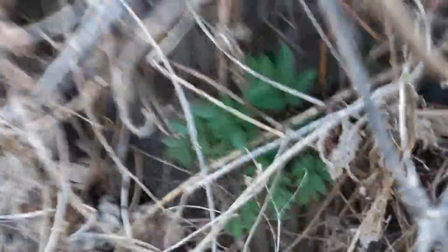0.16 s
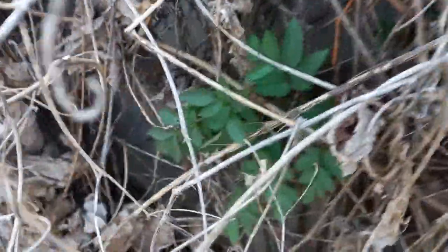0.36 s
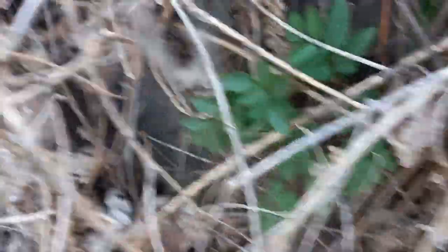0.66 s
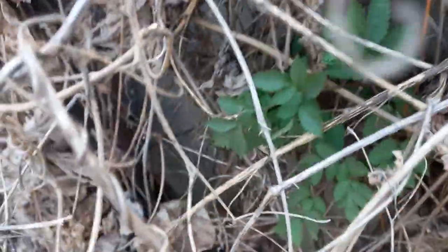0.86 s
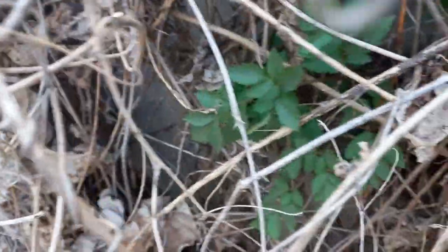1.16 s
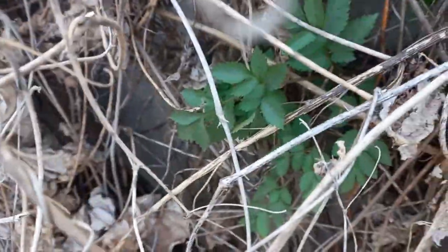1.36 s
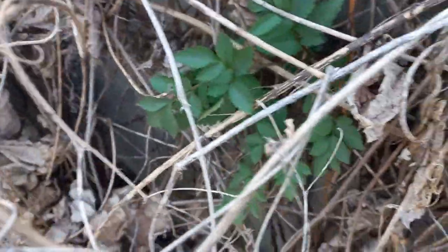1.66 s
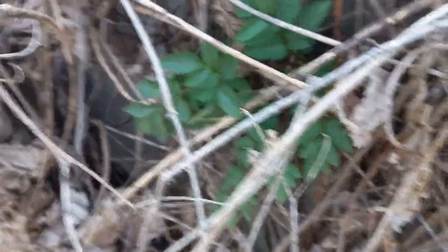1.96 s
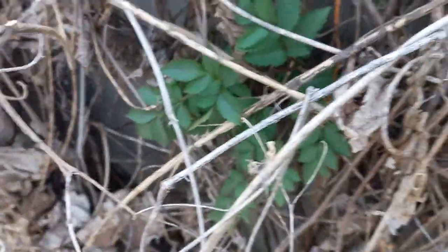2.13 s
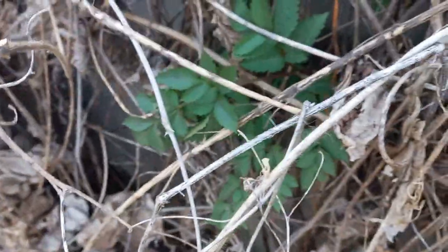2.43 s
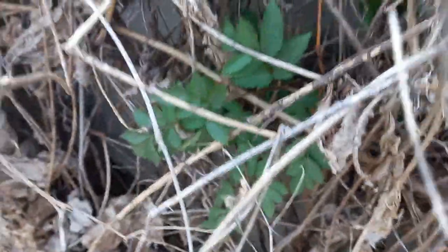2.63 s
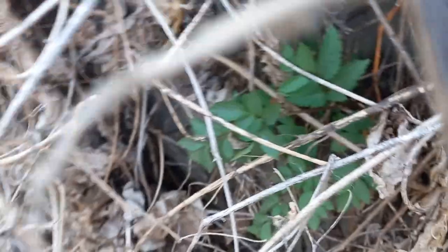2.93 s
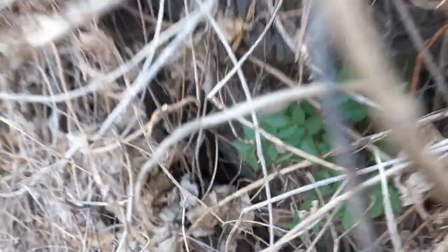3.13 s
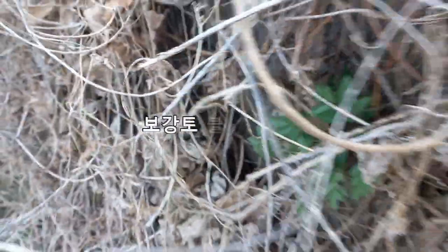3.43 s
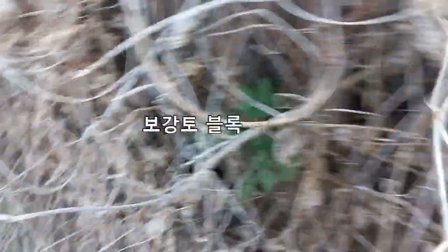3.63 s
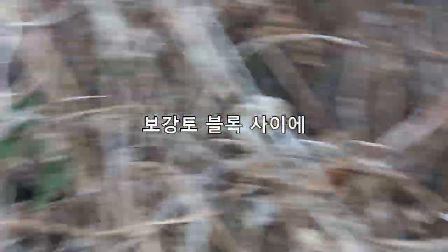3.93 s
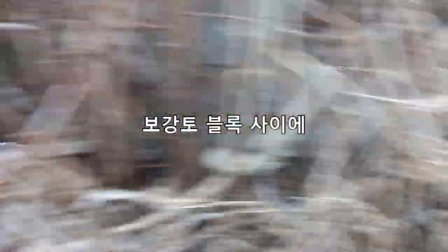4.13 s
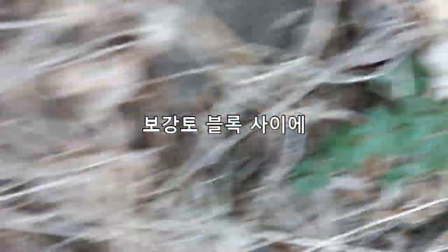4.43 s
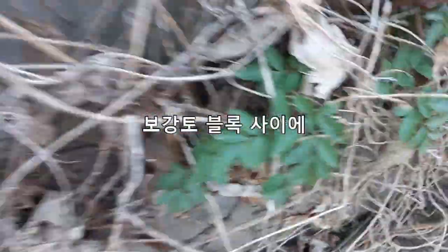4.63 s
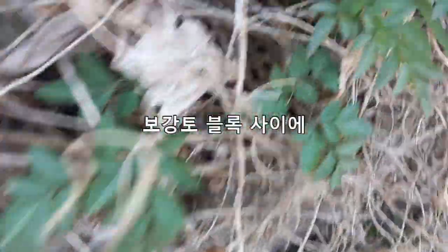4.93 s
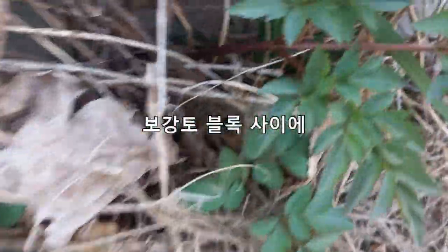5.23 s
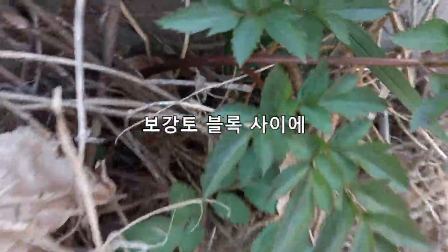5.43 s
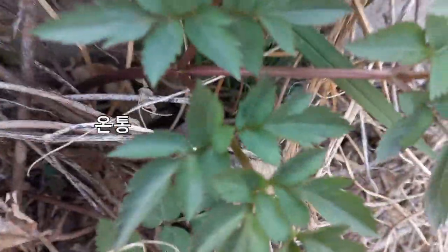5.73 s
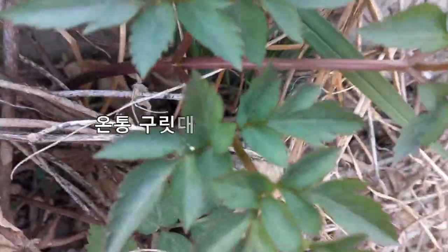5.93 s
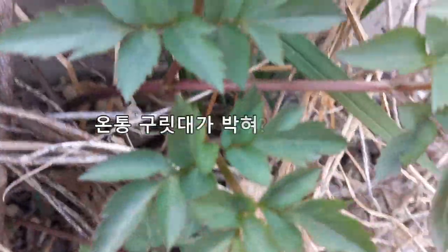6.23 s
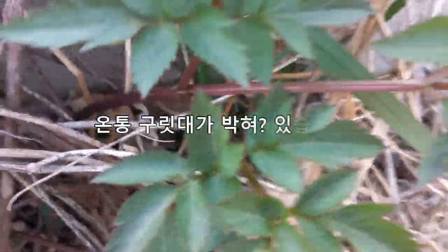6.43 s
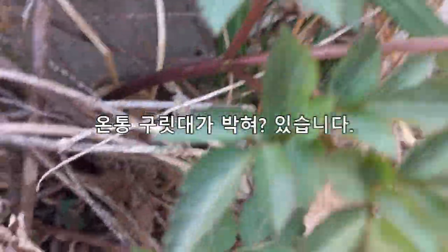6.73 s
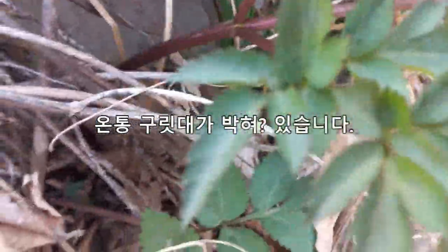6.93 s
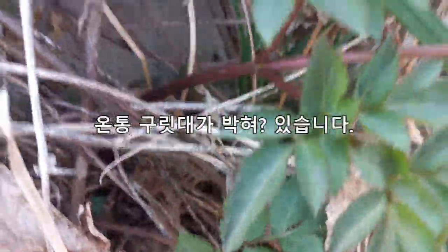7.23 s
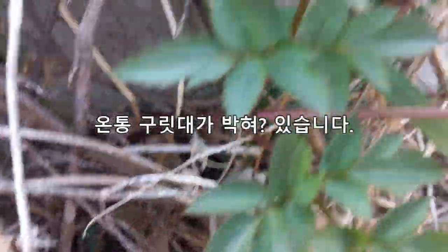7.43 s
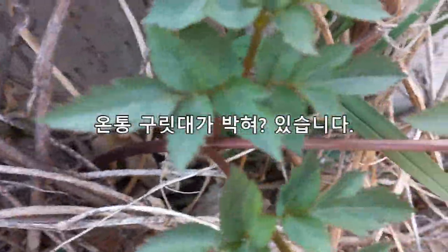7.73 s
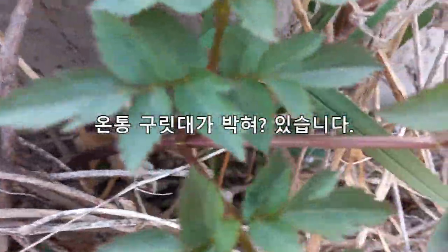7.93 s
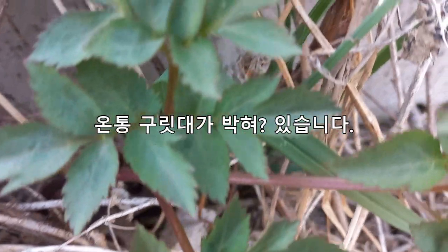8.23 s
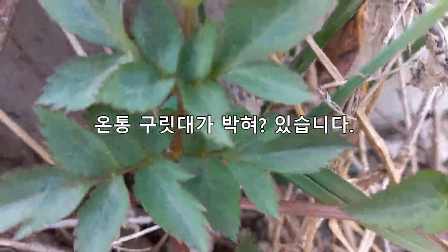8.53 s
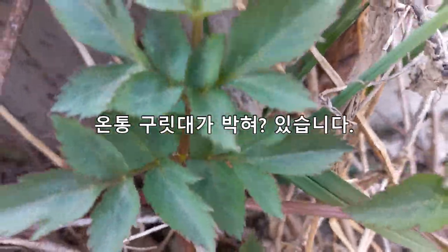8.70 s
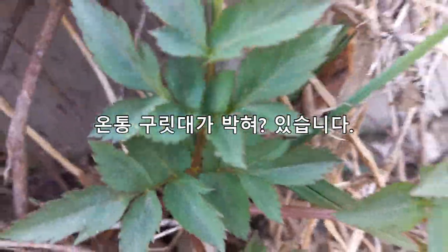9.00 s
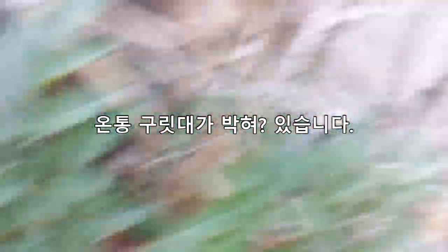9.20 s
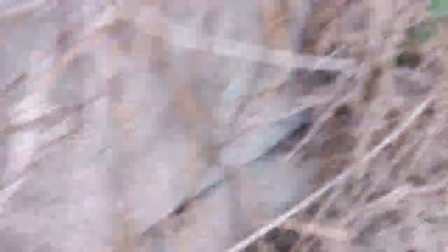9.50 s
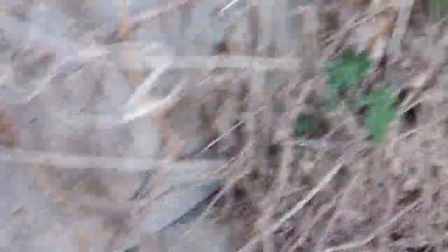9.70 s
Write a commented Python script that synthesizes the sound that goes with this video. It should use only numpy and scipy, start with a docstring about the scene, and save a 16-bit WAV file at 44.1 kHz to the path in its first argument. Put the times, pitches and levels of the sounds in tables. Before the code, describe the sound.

A quiet outdoor bank with low far rumble and soft microphone hiss, recorded close by hand in stereo. Grass stirs at once; from 0.2 to 1.0 s it is pushed aside hard, loudest around 0.6 s, with bright rustling and a dense volley of sharp stem snaps at 0.8-1.0 s, mostly left. It eases to soft rubbing until 2.2 s, then snaps and swishes return, with dry scrapes at 3.1-3.2 s and rustling to 3.7 s. Dull knocks and litter crunch fall near 3.9 s, a small knock at 4.5 s, then a lull. At 5.3-5.8 s stems scrape and crackle, with one hard crack at 5.73 s. Light ticks thin out through 6.7 s. Very faint, sliding bird notes sound far off around 7-7.4 s, barely again later. Sparse snaps follow, a short scrape near 9 s, and a clearer crack at 9.25 s before quiet.

```python
"""A scrubby bank: from the start, a low far rumble and microphone hiss, as shaped noise, under stirring grass.
Within half a second grass and brittle stems are pushed aside close to a hand-held camera: noise with grains
of crackle, single snaps as short noise cracks, crunching steps as dull grains, dull knocks as ringing sines.
The rubbing comes in bursts with easier spells between. From about seven seconds a small bird calls far off,
as sliding sines with echoes, while the last stems stir and snap."""
import sys
import numpy as np
from scipy import signal
from scipy.fft import rfft, irfft, next_fast_len
from scipy.io import wavfile
from scipy.ndimage import uniform_filter1d, map_coordinates

SR = 44100
rng = np.random.default_rng(int(sys.argv[2]) if len(sys.argv) > 2 else 0)


def to_wav(sig):
    """Store sig (one row per channel, or 1-D mono) as 16-bit WAV at the path in sys.argv[1].

    Samples outside -1..1 are clipped; the rate is SR.
    """
    pcm = np.clip(np.atleast_2d(sig), -1, 1) * 32767
    pcm = np.round(pcm).astype(np.int16)
    wavfile.write(sys.argv[1], SR, pcm.T)  # frames by channels


N = 434826

# In all tables the levels are relative: each layer adds a gain of its own. Positive left_right_db is left.
# background far off and in the microphones: start_s, rumble_db, hiss_db
BACKGROUND = [(0, -63, -73), (.9, -60.5, -77), (1.1, -73.5, -85), (1.6, -71.5, -82), (2.5, -68, -77.5),
              (9.86, -69, -79)]
# colour of the far rumble: frequency_hz, density_db (per Hz)
RUMBLE_COLOUR = [(15, -71.5), (25, -43.5), (45, -18), (91, -2), (267, -11), (647, -14.5), (900, -26),
                 (1170, -48), (1980, -120)]
# colour of the microphone hiss: frequency_hz, density_db (per Hz)
HISS_COLOUR = [(410, -30), (700, -6.5), (1240, -8), (2010, -10), (3620, -14), (5220, -19), (6950, -14),
               (15900, -18.5)]
# grass settling between the movements: start_s, level_db
SETTLING = [(0, -49), (.3, -55), (1.05, -71), (1.5, -86), (2.2, -65.5), (3.8, -64), (4.3, -76.5),
            (5.29, -83), (5.32, -71), (6.05, -56.5), (6.45, -62.5), (6.6, -68.5), (7.3, -86), (7.7, -68.5),
            (8.6, -83), (8.74, -65.5), (8.9, -88), (9.05, -65.5), (9.45, -81.5), (9.82, -72.5)]
# where the hand works: start_s, thickness_db (share of the lower crackle), left_right_db
HAND_PLACE = [(0, -2, -6), (.45, -7.5, 5), (.62, -2.5, 8), (.96, -3, 14), (1.35, -11, 7.5), (1.75, -6, 3),
              (1.95, -13.5, 11), (2.3, -5, 6.5), (2.66, -1, 11), (2.97, -7.5, -4.5), (4.64, -3, -6.5),
              (5.3, 0, 8), (5.74, 1.5, 13.5), (6.26, -8, 2), (7.6, -4.5, 9), (9.3, -4.5, 20),
              (9.86, -2.5, -2.5)]
# the hand pushes through the grass, swelling and easing: loudest_s, level_db, swell_s (over 20 dB)
HAND_PUSHES = [(0.245, -37, 0.04), (0.459, -36.5, 0.25), (0.613, -27.5, 0.0331), (0.721, -33.5, 0.0331),
               (.8, -37.5, 0.13), (.9, -42.5, 0.14), (1.321, -47.5, 0.13), (1.659, -53.5, 0.07),
               (1.724, -43.5, 0.0857), (1.9, -50, 0.17), (2.335, -45.5, .03), (2.562, -45, .012),
               (2.642, -40.5, 0.09), (2.7, -42.5, 0.06), (2.865, -53, 0.25), (3.0, -49, 0.04),
               (3.31, -51.5, 0.24), (3.39, -43, 0.17), (3.6, -44.5, 0.16), (3.689, -41.5, 0.13),
               (3.97, -51.5, 0.1), (4.51, -58.5, 0.21), (5.368, -44, 0.072), (5.452, -45, 0.08)]
# a stem catches and drags: loudest_s, level_db, fade_s (over 20 dB, held to 0.003 s or more)
STEM_SCRAPES = [(.378, -36.5, 0.26), (0.66, -36, -0.13), (2.105, -53.5, 0.13), (2.257, -45.5, 0.11),
                (3.071, -41, 0.06), (3.168, -36, 0.16), (5.435, -37.5, 0.015), (5.521, -40, 0.03),
                (5.592, -35.5, 0.03), (5.736, -29.5, 0.0278), (5.759, -31, 0.05), (5.909, -44.5, 0.04),
                (6.024, -51.5, 0.08), (7.563, -51, 0.16), (7.868, -55, 0.16), (8.629, -45, 0.0248),
                (8.952, -46, 0.0453), (8.973, -36, 0.024), (9.22, -44, 0.0345)]
# colour of thin blades: frequency_hz, density_db (per Hz)
BLADE_COLOUR = [(2940, -28.5), (5000, -16), (7170, -12), (8450, -17.5), (11000, -10.5), (15000, -5),
                (15900, -13)]
# colour of hollow stems: frequency_hz, density_db (per Hz)
STEM_COLOUR = [(800, -14), (1400, -6), (1800, -6.5), (2300, -2.5), (2900, -5.5), (4300, -1), (5600, -7),
               (7150, -1), (8300, -7.5), (10500, -2.5), (12500, -7)]
# top treble of the blades: start_s, level_db
BLADE_SHEEN = [(0, 2.5), (4, -3), (5.3, -5.5), (8, -2), (9.86, -2)]
# litter crushed underfoot: loudest_s, level_db, rise_s, fall_s (both over 20 dB)
FOOTSTEPS = [(.44, -61.5, 0.47, 0.2), (.88, -61, 0.36, 0.15), (2.83, -63.5, 0.39, 0.19),
             (3.45, -65, 0.45, 0.39), (3.906, -53, 0.0037, 0.22), (3.968, -44, 0.048, 0.033),
             (4.515, -53, 0.031, 0.083), (5.738, -56.5, 0.011, 0.098)]
# colour of the litter: frequency_hz, density_db (per Hz)
LITTER_COLOUR = [(71, -52.5), (120, -9), (284, -3.5), (437, -1), (850, -3.5), (2520, -24), (3000, -35),
                 (6600, -120)]
# stems breaking: start_s, level_db, thickness_db (hollow-stem part against thin-blade part)
STEM_SNAPS = [(0.3351, -23.5, -21.5), (0.5917, -22.5, -17.5), (0.656, -27, -22), (.6964, -36.5, -12),
              (.742, -25.5, -16), (0.797, -14.5, -22.5), (0.805, -29, -16), (0.8112, -27, -22),
              (.8431, -26, -12), (0.8553, -17, -18), (0.8667, -17, -15), (0.889, -23, -15),
              (0.899, -15.5, -10.5), (0.9553, -17.5, -15.5), (.958, -28, -17), (.962, -31, -30),
              (.9748, -23, -22), (0.977, -19, -22), (1.0143, -29.5, -23), (1.0264, -26.5, -14.5),
              (1.1282, -41, -12), (2.2511, -34, -20.5), (2.4654, -21.5, -19.5), (2.5715, -34.5, -7),
              (2.6544, -24.5, -7.5), (2.9022, -26.5, -22), (2.9747, -33, -13.5), (3.064, -30, -10),
              (3.0718, -33.5, -15), (3.075, -31, -13), (3.126, -35, -5.5), (3.2077, -30.5, -12),
              (3.403, -39, -5.5), (3.467, -43.5, 6.5), (3.5, -34, -14), (5.31, -37, -1), (5.327, -37, -4),
              (5.47, -34, -2.5), (5.503, -33.5, -10), (5.732, -15, -10), (5.749, -27, -5.5),
              (5.7735, -29, -18), (5.885, -34.5, -20), (5.961, -31, -23), (6.071, -32.5, -30),
              (6.16, -44, -3.5), (6.2022, -35, -22), (6.243, -32, -5), (6.32, -46, -6.5), (6.327, -41, -16),
              (6.334, -42, -8.5), (6.343, -44.5, -5.5), (6.389, -42, -7), (6.7336, -34.5, -27),
              (7.409, -45.5, -7.5), (7.656, -30, -15.5), (7.71, -39.5, -12), (7.748, -43, -11.5),
              (7.893, -48, -13), (8.146, -49.5, -6.5), (8.307, -49, -11), (8.6234, -40, -7),
              (8.7175, -39, -8), (9.248, -24.5, -14), (9.27, -40, -11)]
# hollow stalks and the camera body knocked: start_s, level_db, pitch_hz, t60_s, left_right_db
STALK_KNOCKS = [(0.4223, -37.5, 716, 0.013, 8), (0.866, -31, 146, 0.0072, 27), (0.977, -36, 94, 0.058, 29),
                (2.061, -56.5, 720, 0.027, 0), (2.637, -44.5, 2130, 0.055, 21),
                (3.4659, -39, 705, 0.014, 8), (3.684, -41.5, 111, 0.019, -3),
                (3.931, -34, 276, 0.024, -1.5), (3.973, -40, 796, .025, 0), (4.499, -38.5, 840, 0.014, 6),
                (4.507, -39.5, 644, 0.016, -10), (5.7327, -28.5, 10950, 0.011, 16),
                (5.759, -42.5, 2400, 0.044, 13), (6.2452, -53, 1500, .021, 0),
                (6.243, -50.5, 2620, 0.036, 0), (6.733, -61, 5050, 0.05, 5)]
# bird notes, held then sliding: start_s, hold_s, slide_s, first_hz, last_hz, level_db
BIRD_NOTES = [(6.972, 0.044, .045, 7600, 6340, -83.5), (7.136, 0.052, 0.038, 7370, 5700, -78.5),
              (7.289, 0.016, 0.069, 6780, 3270, -79), (8.44, 0.08, .01, 3670, 3660, -93),
              (9.27, 0.01, 0.047, 4700, 4140, -80)]

EASE, ROUNDNESS = 0.84, 1.17  # easing time over swelling time; 1 pointed, 2 round
CATCH_S = 0.0063  # rise of a scrape over 20 dB
SHEEN_HZ = 11200
NOTE_EDGE_S, SLIDE_LOSS_DB = 0.0041, 5  # fade in and out of a note; weakening over its slide
SHELF_HZ, TOP_HZ = 15900, 16984  # top treble is weaker above SHELF_HZ, silent above TOP_HZ


def amp(db):
    """Decibels to linear gain."""
    return 10 ** (np.asarray(db) / 20)


def unit(x):
    """Scale to an rms of 1."""
    return x / np.sqrt(np.mean(x ** 2) + 1e-20)


def curves(rows):
    """One value per sample for each column after the time."""
    s, *cols = np.transpose(rows)
    return np.array([np.interp(np.arange(N) / SR, s, c) for c in cols])


def sides(pan_db):
    """Left and right gains of constant total power."""
    ratio = amp(pan_db)
    return np.array([ratio, np.ones_like(ratio)]) * np.sqrt(2 / (1 + ratio ** 2))


def filtered(x, response):
    """Multiply the spectrum of x by a response of frequency."""
    m = next_fast_len(N + 8192)
    return irfft(rfft(x, m) * response(np.fft.rfftfreq(m, 1 / SR)), m)[..., :N]


def coloured(x, spectrum):
    """Shape x by (Hz, dB) points on a log axis, power kept for white input."""
    f, db = np.transpose(spectrum)

    def gain(hz):
        return unit(amp(np.interp(np.log(hz + 1), np.log(f), db, left=-120, right=-120)))

    return filtered(x, gain)


def noise(alike, patchy_db, size=128):
    """Stereo white noise with a shared part; its colour changes in short random patches."""
    z = signal.stft(rng.standard_normal((2, N)), nperseg=size)[2]
    patches = rng.standard_normal(z.shape[1:])
    patches = unit(uniform_filter1d(uniform_filter1d(patches, 5, 0), 3, 1))
    a, b = unit(signal.istft(z * amp(patchy_db * patches), nperseg=size)[1][:, :N])
    alike = np.clip(alike, 0, 1)
    return np.array([a, alike * a + np.sqrt(1 - alike ** 2) * b])


def fading(kicks, t60):
    """Every kick dies away exponentially."""
    return signal.lfilter([1], [1, -amp(-60 / (max(t60, 1e-3) * SR))], kicks)


def grains(rate, spread_db, t60):
    """Envelope of rms 1 of random contacts: many small, few large, coming in clumps."""
    clump = amp(4 * map_coordinates(rng.standard_normal(500), [np.arange(N) * 490 / N]))
    draw = rng.random((3, N))
    size = amp(-spread_db * np.log(draw[1:] + 0.00059).sum(0))
    kicks = (draw[0] < rate * clump / SR) * size
    return unit(fading(fading(kicks, t60), t60))  # twice: a rounded rise


def swells(rows, roundness):
    """Level that rises to each (s, dB, rise s, fall s) peak and falls away; powers add."""
    t, power = np.arange(N) / SR, np.zeros(N)
    for s, db, *spans in rows:
        rise, fall = np.maximum(spans, .003)
        near = slice(max(round((s - 4 * rise) * SR), 0), round((s + 4 * fall) * SR))
        away = np.where(t[near] < s, (s - t[near]) / rise, (t[near] - s) / fall)
        power[near] += amp(db - 20 * away ** roundness) ** 2
    return np.sqrt(power)


def air():
    """Far rumble, partly shared by the microphones, and hiss almost wholly each one's own."""
    rumble_db, hiss_db = curves(BACKGROUND)
    rumble = coloured(noise(0.22, patchy_db=0.6, size=2048), RUMBLE_COLOUR)
    hiss = coloured(noise(0.018, patchy_db=0.8, size=512), HISS_COLOUR)
    rumble = amp(rumble_db + 3.0) * sides(4.8)[:, None] * rumble
    return rumble + amp(hiss_db + 9) * sides(1.5)[:, None] * hiss


def stems():
    """Rubbing and breaking shake the same thin blades and hollow stems."""
    thin, thick = rubbing() + breaking()
    thin = coloured(thin, BLADE_COLOUR)
    top = filtered(thin, lambda hz: 1 / (1 + (SHEEN_HZ / (hz + 1)) ** 8))
    sheen = amp(curves(BLADE_SHEEN)[0])
    return thin + (sheen - 1) * top + coloured(thick, STEM_COLOUR)


def rubbing():
    """Blades and stems slide over each other: a hiss with crackle on it, as (thin or thick, side, sample)."""
    thick_db, pan_db = curves(HAND_PLACE)
    stroke = movement()
    # settling blades tick one by one
    stir = amp(curves(SETTLING)[0]) * (.5 + grains(rate=120, spread_db=0.5, t60=0.011))
    crackle = 0.7 * grains(rate=700, spread_db=2.5, t60=0.0087)
    crackle += .8 * grains(rate=170, spread_db=2.2, t60=.002)  # shorter, sparser ticks
    slow_crackle = 0.5 * grains(rate=190, spread_db=1.5, t60=0.029)  # thick stems only
    thin = stroke * (0.9 + crackle) + 2 * stir
    thick = stroke * (0.78 + crackle + slow_crackle) + 2 * stir
    thin = amp(-6.5) * thin * sides(pan_db)
    thick = amp(thick_db - 9.0) * thick * sides(pan_db)
    return np.array([thin * noise(0.017, patchy_db=4.0, size=512),
                     thick * noise(0.023, patchy_db=3.5, size=1024)])


def movement():
    """How hard the grass is rubbed: the powers of pushes and scrapes together."""
    pushes = swells([(s, db, swell, EASE * swell) for s, db, swell in HAND_PUSHES], ROUNDNESS)
    scrapes = swells([(s, db, CATCH_S, fade) for s, db, fade in STEM_SCRAPES], roundness=0.99)
    return np.sqrt(pushes ** 2 + scrapes ** 2)


def steps():
    """Weight sinks into dead litter: dull grains, much alike at both microphones."""
    crush = 0.7 + grains(rate=340, spread_db=3.5, t60=0.021)
    level = amp(2.5) * swells(FOOTSTEPS, roundness=1.17)
    return coloured(level * crush * noise(0.7, patchy_db=3.5, size=512), LITTER_COLOUR)


def breaking():
    """A very short crack in a colour of its own, then splinters; the far microphone hears it later and weaker."""
    out, t = np.zeros((2, 2, N + SR)), np.arange(4096) / SR  # (thin or thick, side, sample)
    pan_db = curves(HAND_PLACE)[1]
    lead = 64  # samples of room ahead of the crack for the colour filter
    for s, db, thick_db in STEM_SNAPS:
        at = round(s * SR)
        a, b, draw = rng.standard_normal((3, 2, len(t)))
        bits_db = 28 * uniform_filter1d(draw[0], 60)  # splinters fall unevenly
        splinters = amp(bits_db - 10 + 0.81 * thick_db - 60 * t / 0.034)  # thick stems splinter more
        shape = (amp(-60 * t / .002) + splinters) * (1 - np.exp(-t / .0002))
        colour = unit(amp(2.5 * unit(uniform_filter1d(draw[1, :len(t) // 2 + 1], 120))))
        cracks = shape * [a, unit(.7 * a + .7 * b)]  # the right side half shared with the left
        cracks = irfft(rfft(np.roll(cracks, lead)) * colour)
        left, right = (side / np.abs(side).max(1, keepdims=True) for side in cracks)
        lag = round(1.4 * np.clip(pan_db[at], -12, 12))  # samples, right after left
        gains = amp(db + 7.5) * np.outer(amp([0, thick_db]), sides(pan_db[at]))
        start = at - lead
        out[:, 0, start:start + len(t)] += gains[:, :1] * left
        out[:, 1, start + lag:start + lag + len(t)] += gains[:, 1:] * right
    return out[..., :N]


def knocks():
    """Each blow rings once at a pitch of its own, and moves little air in the deep bass."""
    out, t = np.zeros((2, N + SR)), np.arange(SR // 5) / SR
    for s, db, hz, t60, pan_db in STALK_KNOCKS:
        ring = amp(db + 8.5 - 60 * t / t60) * np.sin(2 * np.pi * hz * t) * (1 - np.exp(-t / 0.00011))
        dull = uniform_filter1d(uniform_filter1d(rng.standard_normal(len(t)), size=8), size=8)
        ring += amp(db + 4.5 - 60 * t / 0.011) * dull  # the woody crack
        out[:, round(s * SR):][:, :len(t)] += sides(pan_db)[:, None] * ring
    return filtered(out[:, :N], lambda hz: (1j * hz / (1j * hz + 60)) ** 2)


def bird():
    """A slightly hoarse whistle, blurred by echoes from the scrub."""
    whistle = np.zeros(N)
    hoarse_hz = 700 * uniform_filter1d(rng.standard_normal(N), 80)  # random wander of the pitch
    for s, hold, slide, first_hz, last_hz, db in BIRD_NOTES:
        t, at = np.arange(round((hold + slide) * SR)) / SR, round(s * SR)
        slid = np.clip((t - hold) / slide, 0, 1)
        pitch_hz = first_hz * (last_hz / first_hz) ** slid + hoarse_hz[at:at + len(t)]
        edges = np.clip(np.minimum(t, hold + slide - t) / NOTE_EDGE_S, 0, 1)
        level = amp(db + 16.5 - SLIDE_LOSS_DB * slid) * edges
        whistle[at:at + len(t)] += level * np.sin(2 * np.pi * np.cumsum(pitch_hz) / SR)
    t = np.arange(SR // 4) / SR
    echoes = rng.standard_normal((2, len(t))) * amp(-60 * t / 0.16)
    echoes /= np.linalg.norm(echoes[0])
    wet = signal.fftconvolve(whistle[None], echoes, axes=1)[:, :N]
    return amp(-6) * whistle + wet


def scene():
    """All sounds of the bank together at the two microphones."""
    return air() + stems() + steps() + knocks() + bird()


def record(dry):
    """Highest peaks are rounded off; the top treble is lowered, then cut."""
    return filtered(np.tanh(dry), lambda hz: np.where(hz < SHELF_HZ, 1, amp(-5.5)) * (hz < TOP_HZ))


dry = scene()
out = record(dry)
to_wav(out)
```